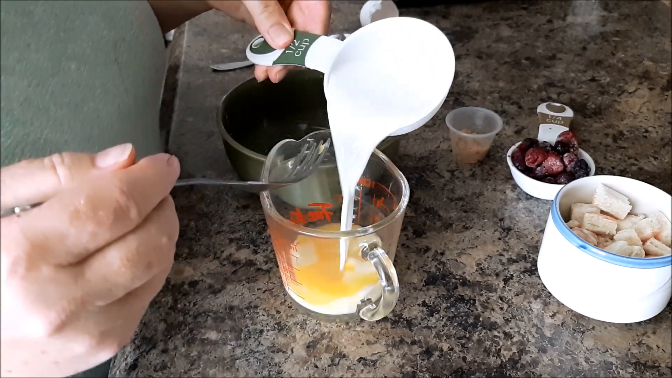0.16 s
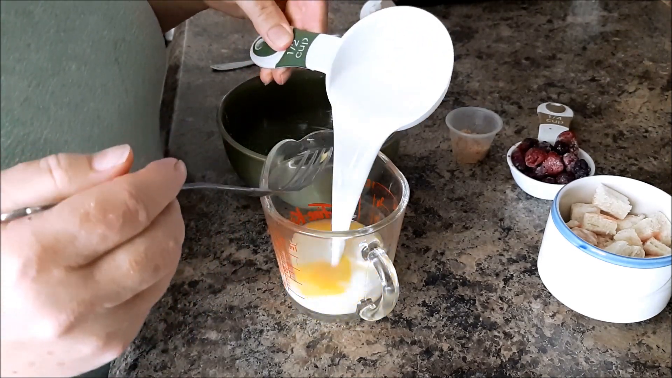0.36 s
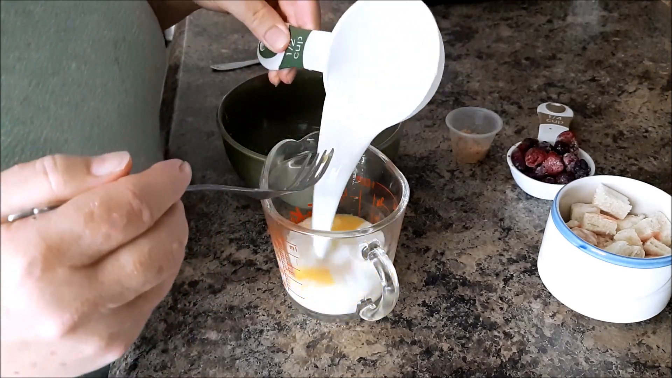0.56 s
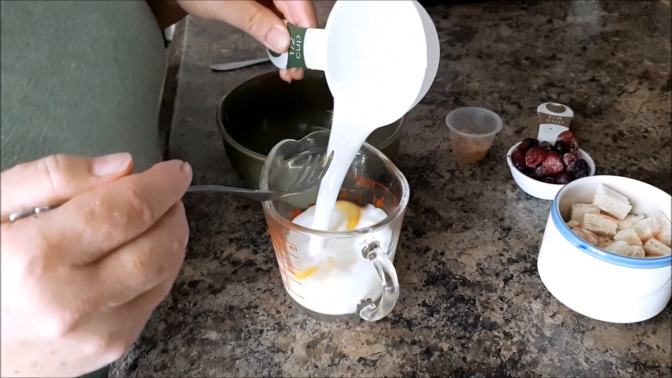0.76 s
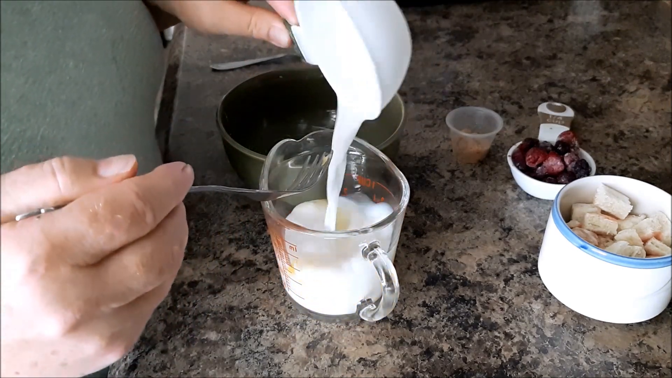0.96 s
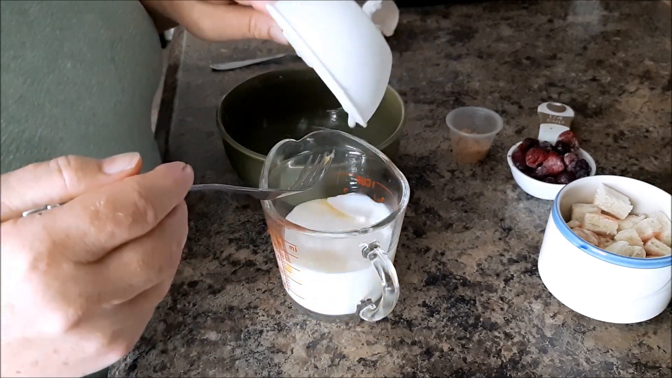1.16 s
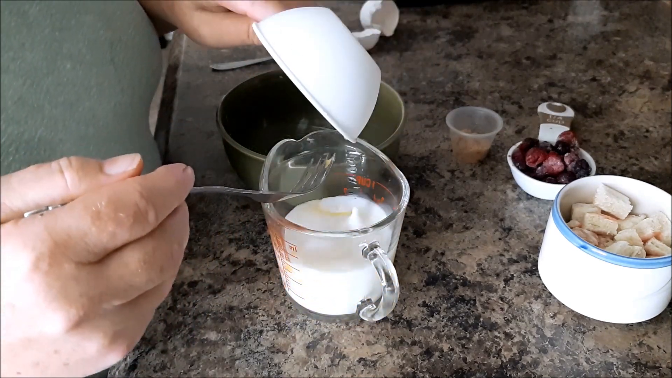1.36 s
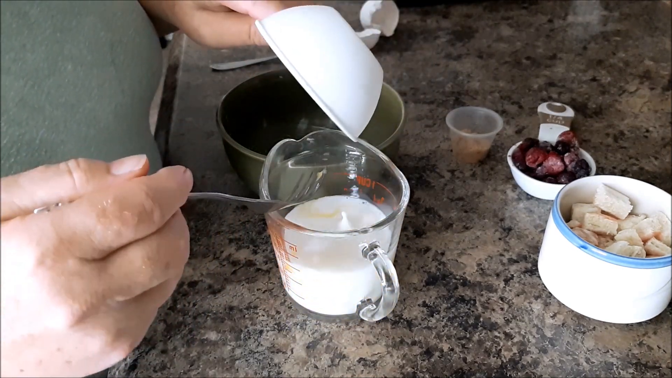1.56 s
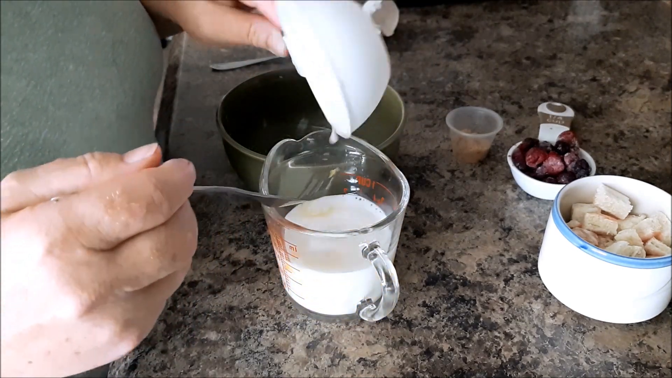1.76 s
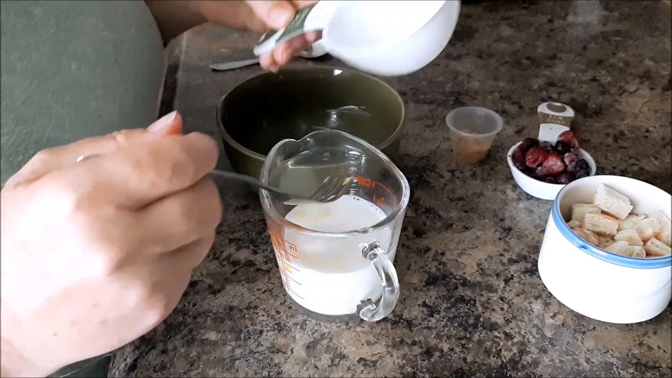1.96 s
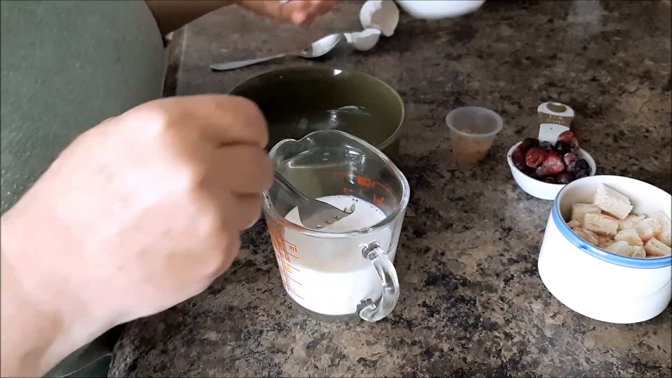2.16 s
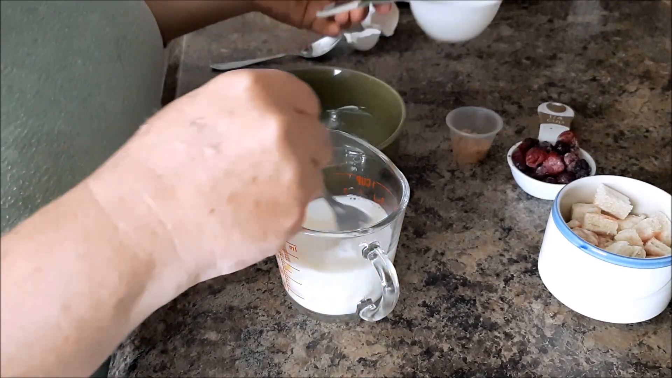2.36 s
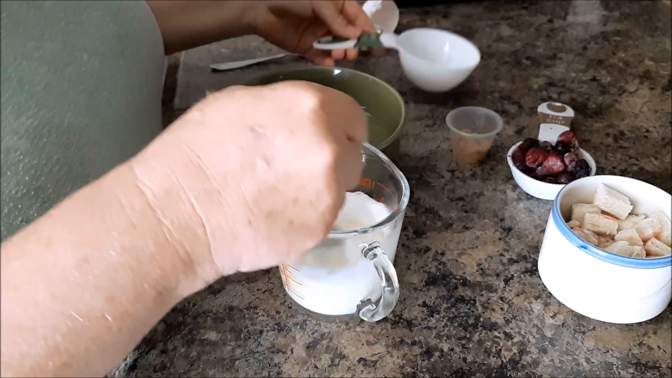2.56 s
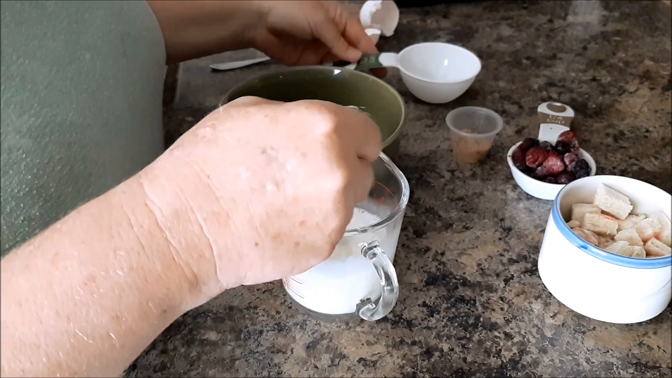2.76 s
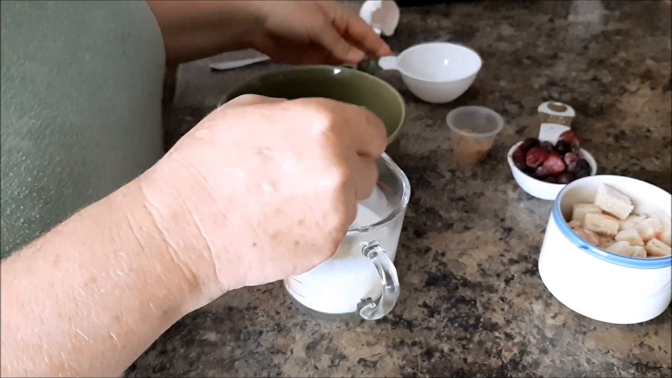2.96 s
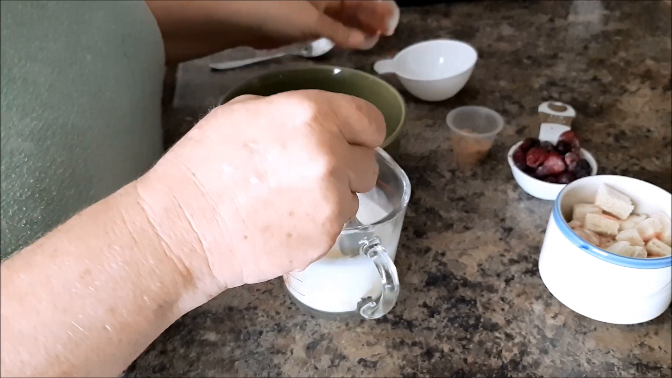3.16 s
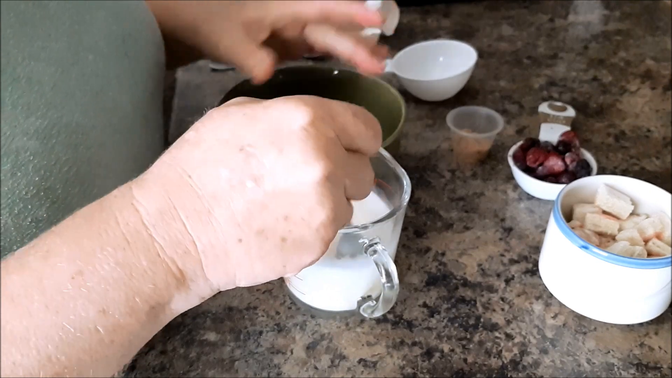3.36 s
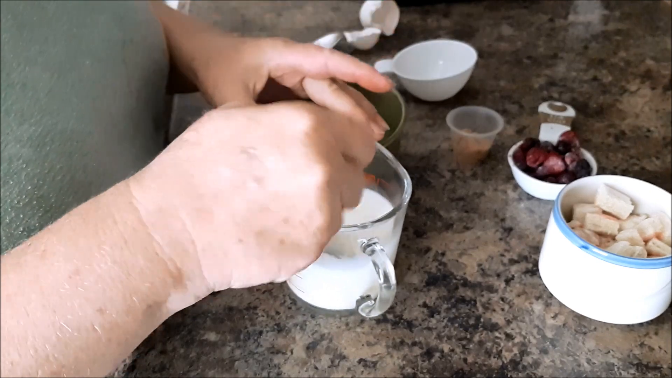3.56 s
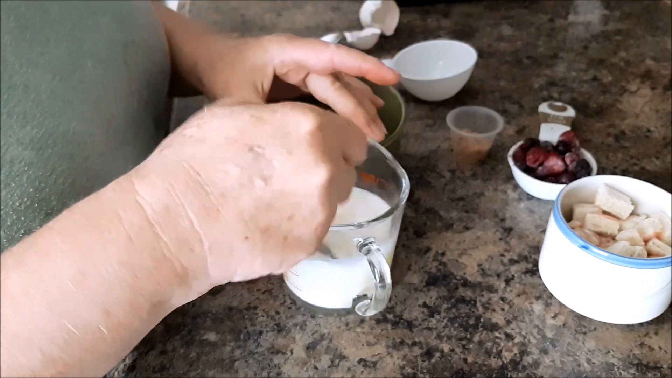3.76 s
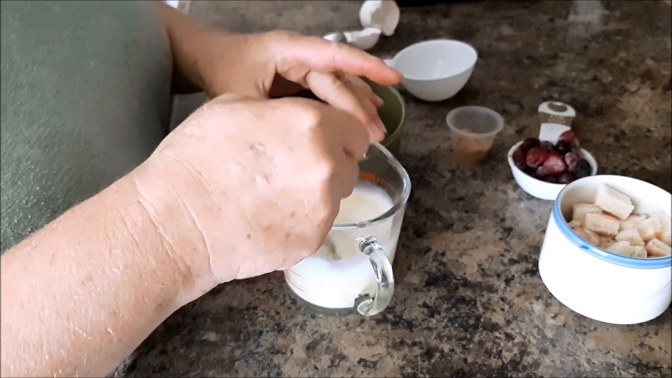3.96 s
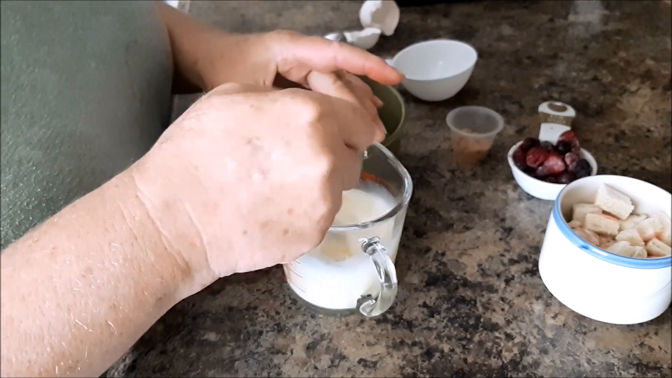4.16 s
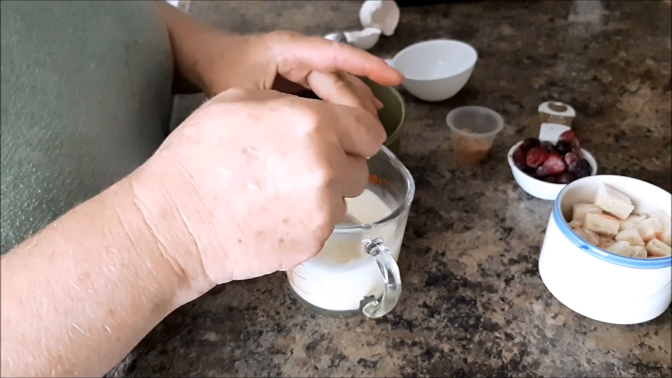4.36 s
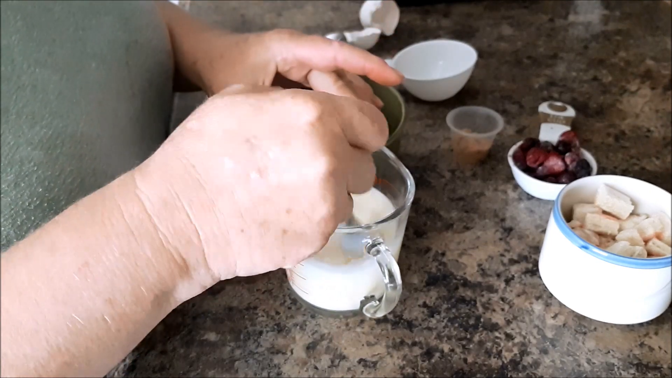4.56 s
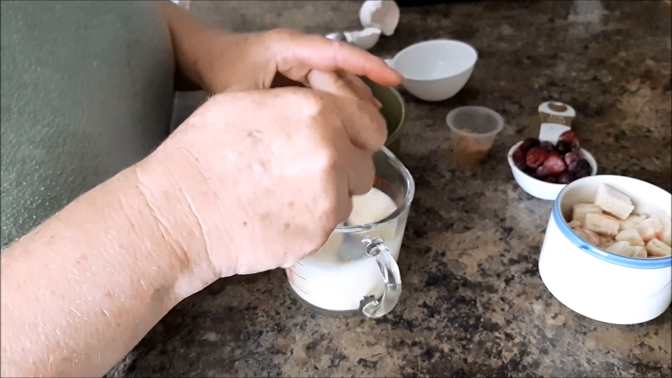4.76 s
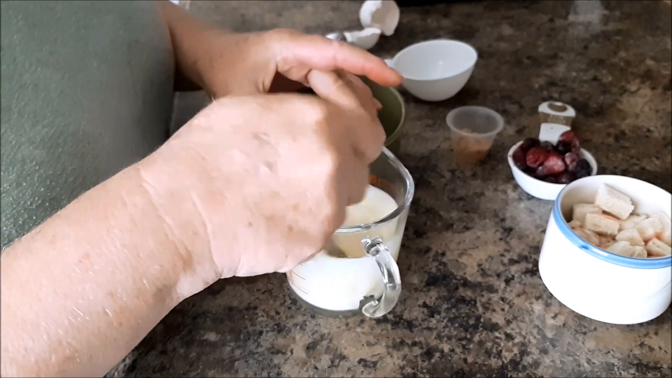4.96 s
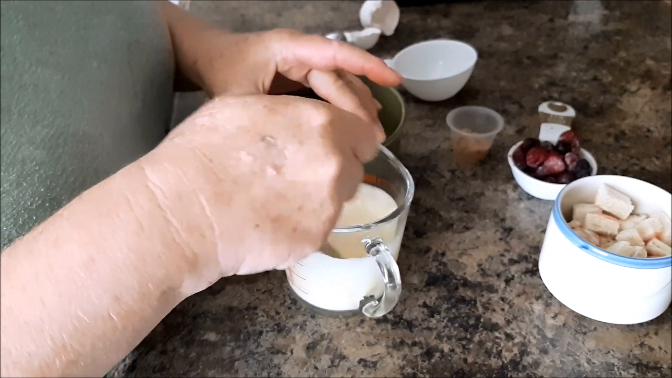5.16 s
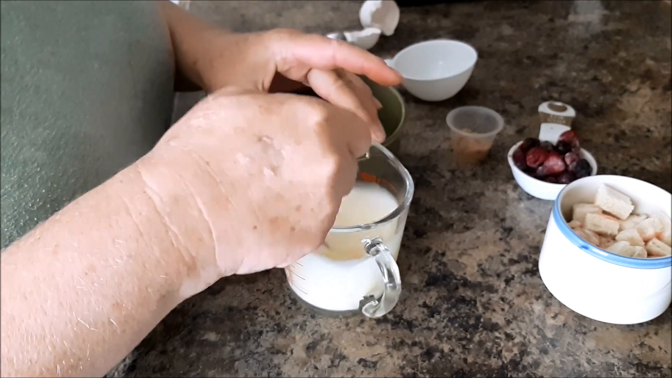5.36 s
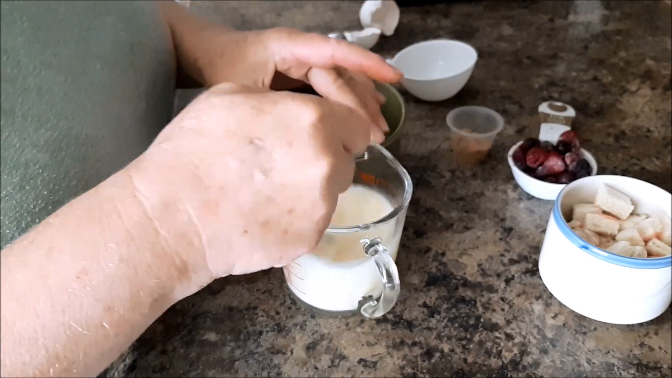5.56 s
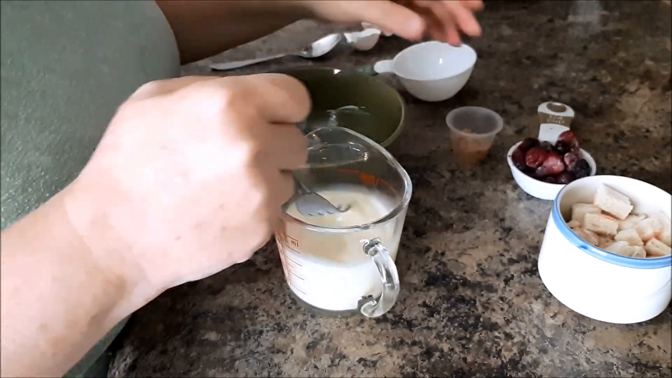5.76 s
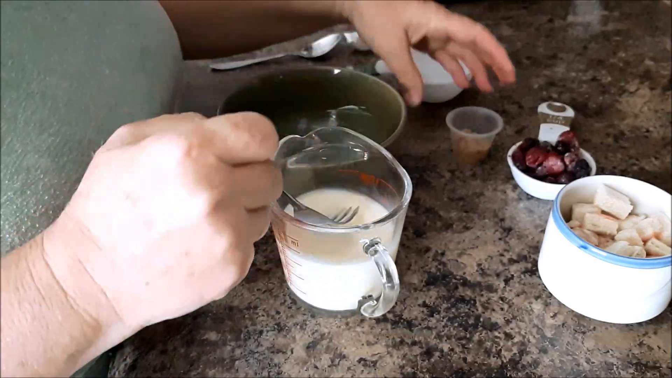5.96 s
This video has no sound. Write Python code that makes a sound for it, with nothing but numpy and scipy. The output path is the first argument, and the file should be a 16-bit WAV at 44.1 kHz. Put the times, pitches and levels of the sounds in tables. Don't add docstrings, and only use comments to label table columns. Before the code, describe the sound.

In a quiet kitchen with faint fan hiss and fridge hum, a light plastic scoop gives a few soft taps. Then a metal fork starts beating liquid in a glass cup, the scoop clacks and bounces on the stone counter, and fast, even glassy clicks continue with little wet gulps until they stop just before the end. Close phone microphone, slight room reverberation.

```python
import sys
import numpy as np
from scipy import signal
from scipy.fft import rfft, irfft, next_fast_len
from scipy.io import wavfile
from scipy.ndimage import uniform_filter1d

SR = 44100
rng = np.random.default_rng(int(sys.argv[2]) if len(sys.argv) > 2 else 0)


def voltage_ratio(level):
    return 10 ** (np.asarray(level, float) / 20)


def generate_wav(sig):
    pcm = np.round(np.clip(np.atleast_2d(sig).T, -1, 1) * 32767).astype(np.int16)
    wavfile.write(sys.argv[1], SR, pcm)


N = 264600
T = np.arange(SR // 3) / SR

# start [s], wall level [dB],
# tine under the liquid [dB], its pitch [Hz], shove on the cup [dB].
PUSHES = [(2.3368, -41.5, -42.5, 2600, -54.5), (2.464, -25, -35, 4390, -44), (2.611, -16.5, -28, 4400, -34),
          (2.6979, -24, -33, 4400, -48), (2.733, -50, -31.5, 4260, -67), (2.902, -28.5, -27, 4000, -45.5),
          (3.0893, -26, -25, 3770, -46), (3.265, -22, -23.5, 3850, -37.5),
          (3.4354, -31.5, -34, 3130, -45.5), (3.5968, -22.5, -34, 3440, -46),
          (3.7704, -23, -33.5, 3450, -43.5), (3.947, -23, -38, 4700, -44.5),
          (4.1157, -19.5, -16, 4015, -40.5), (4.2904, -22, -26.5, 4140, -34), (4.4615, -26, -24, 3106, -42),
          (4.6394, -19, -28.5, 3300, -38.5), (4.814, -24, -18.5, 4050, -34), (4.988, -21, -19.5, 4220, -39),
          (5.1683, -17.5, -23, 4210, -33), (5.346, -20, -15, 4030, -39.5),
          (5.5175, -15.5, -23.5, 4480, -44.5)]
RETURNS = [(2.501, -16.5, -22.5, 3080, -48), (2.809, -22, -33.5, 2980, -48),
           (3.0059, -24, -30.5, 4030, -47), (3.1783, -21, -18.5, 3573, -49),
           (3.353, -23, -23.5, 3500, -47.5), (3.5203, -20, -24, 3286, -46.5),
           (3.696, -17, -43, 4240, -43.5), (3.8659, -19.5, -35.5, 3240, -42.5),
           (3.912, -23.5, -22, 4550, -53), (4.0429, -18, -33.5, 2730, -45), (4.2172, -22, -28, 2745, -45),
           (4.397, -20, -27.5, 3385, -51), (4.5694, -20.5, -23, 2850, -41), (4.7434, -20.5, -30, 3230, -42),
           (4.9234, -20.5, -27, 2743, -41.5), (5.0996, -18.5, -23.5, 3150, -42.5),
           (5.2753, -15, -31.5, 2520, -43.5), (5.449, -22.5, -23, 2627, -42.5)]
# frequency [Hz], likeness [0 to 1].
ALIKE = [(60, .8), (130, 0.4), (290, 0.31), (640, 0.32), (1400, .02), (12000, .01)]


def unit(x):
    return x / np.sqrt(np.mean(x ** 2) + 1e-20)


def along(points, hz):
    f, v = np.transpose(points)
    return np.interp(np.log(hz + 1), np.log(f + 1), v)


def filtered(x, response):
    m = next_fast_len(x.shape[-1] + 8192)
    spectrum = rfft(x, m) * response(np.fft.rfftfreq(m, 1 / SR))
    return irfft(spectrum, m)[..., :x.shape[-1]]


def resonant(peaks):
    def response(f):
        total = 0
        for k, (centre, width, db) in enumerate(peaks):
            damping = 1j * f * width
            total = total + (-1) ** k * voltage_ratio(db) * damping / (centre ** 2 - f ** 2 + damping)
        return total
    return response


def stereo_angle(hz):
    return np.arccos(np.clip(along(ALIKE, hz), 0, 1)) / 2


def pair(response, count):
    def mid_side(hz):
        angle = stereo_angle(hz)
        return response(hz) * [np.cos(angle), np.sin(angle)]

    mid, side = filtered(rng.standard_normal((2, count)), mid_side)
    return unit(np.array([mid + side, mid - side]))


def ring(modes, scatter_db, rough=0, rise=.0001):
    hz, db, t60 = np.transpose(modes)[:, :, None]
    t = T[T < 1.5 * t60.max()]
    luck = rng.standard_normal((len(modes), 1))
    flutter = rough * np.cumsum(rng.standard_normal((len(modes), len(t))), axis=1)
    decay = voltage_ratio(db + scatter_db * luck - 60 * t / t60)
    x = np.sum(decay * np.sin(2 * np.pi * hz * t + flutter), axis=0)
    x = x * (1 - np.exp(-t / rise)) ** 2
    return np.pad(x / np.abs(x).max(), (0, len(T) - len(t)))


def puff(response, t60):
    noise = unit(filtered(rng.standard_normal(len(T)), response))
    return noise * voltage_ratio(-5.5 - 60 * T / t60)


def add(mix, s, x, pan_db, wet_db):
    # frequency [Hz], t60 [s].
    room = [(150, 0.41), (1000, 0.47), (4000, 0.36), (9000, 0.42), (15000, 0.26)]
    hz = np.fft.rfftfreq(256, 1 / SR)[:, None]
    t = np.arange(118) * 128 / SR
    angle = stereo_angle(hz) * np.clip(hz / 420, 0, 1)
    fade = voltage_ratio(-60 * t / along(room, hz))
    noise = rng.standard_normal((2, *fade.shape)) + 1j * rng.standard_normal((2, *fade.shape))
    mid, side = noise * [np.cos(angle), np.sin(angle)]
    tail = signal.istft(fade * [mid + side, mid - side], nperseg=256)[1][:, :len(T)]
    tail = tail * np.clip(T / 0.00047, 0, 1) * (1 + 3.5 * np.exp(-T / 0.0045))
    tail = tail / np.linalg.norm(tail) * 1.93
    wet = signal.fftconvolve(x[None], tail, axes=1)[:, :len(T)]
    sides = voltage_ratio([[pan_db / 2], [-pan_db / 2]])
    mix[:, round(s * SR):][:, :len(T)] += (x + voltage_ratio(wet_db) * wet) * sides


def tine_under_liquid(hz):
    modes = [(hz, 0, .022), (1.07 * hz, -5.5, .015), (0.82 * hz, -7, .015), (1.4 * hz, -5, .015)]
    return ring(modes, scatter_db=1.5, rough=0.12) * np.clip(T / 0.00085, 0, 1)


def rim(hz, t60):
    return ring([(hz, 0, t60), (0.93 * hz, -3.5, .02)], scatter_db=4, rough=0.011)


def glass_wall(near, where):
    # frequency [Hz], level [dB], t60 [s].
    glass = [(4400, -22, 0.0052), (5230, -3.5, 0.0095), (5130, 7, 0.061), (5052, 0.5, 0.017),
             (5792, 2.5, 0.015), (5990, -33, 0.057)]
    spot_hz = 5183 * np.exp(0.021 * where)
    spot = ring([(spot_hz, 0, .025), (1.04 * spot_hz, -5, .015)], scatter_db=0.5, rough=0.14)
    wall = voltage_ratio(-4.0) * ring(glass, scatter_db=7, rough=0.15) + voltage_ratio(-6.0) * spot
    handle_db = -12 + 2 * rng.standard_normal()
    handle = ring([(5936, 0, 0.042)], scatter_db=0, rough=.11)
    return wall + near * voltage_ratio(handle_db) * handle


def fork():
    # frequency [Hz], width [Hz], level [dB].
    tine_modes = [(9360, 1400, -1.5), (10320, 1440, 3), (14060, 1400, 8.5), (16400, 490, -9)]
    # frequency [Hz], level [dB per Hz].
    crack = [(410, -66), (700, -29), (1080, -8), (1940, -5), (2360, -23), (2630, 9), (3470, -5),
             (4060, 10.5), (4700, -19), (5220, -15), (7770, -4), (14100, -5), (15700, -7), (16500, -54.5)]
    # time [s], sparkle [dB].
    wrist = [(2.34, -30.5), (2.48, -30.5), (2.62, -36), (2.75, -34), (2.8, -27), (3.15, -26.5),
             (3.6, -24.5), (4.25, -23.5), (5.55, -26)]
    # start [s], peak [dB], pitch [Hz].
    rebounds = [
        (2.824, -46, 2780),
        (3.1086, -24, 2826),
        (4.151, -33, 3890),
        (4.2278, -28.5, 2570),
        (4.3034, -20, 3300),
        (4.365, -35, 2770),
        (4.7562, -24.5, 2670),
        (4.8338, -28, 4260),
        (5.191, -27.5, 3000),
        (5.36, -46, 4100),
    ]
    # start [s], peak [dB], pitch [Hz].
    rim_rings = [(2.466, -37.5, 1820), (2.5044, -19, 2060), (2.81, -36, 2120), (2.9035, -31, 2004),
                 (3.2651, -29, 1883), (3.5974, -34.5, 2104), (3.7712, -23.5, 1845), (3.8656, -33.5, 2123),
                 (3.9132, -23.5, 2053), (4.289, -35, 1920), (4.4622, -33.5, 1830), (4.5715, -27.5, 2110),
                 (4.642, -25.5, 1880), (4.8142, -25.5, 1940), (4.9886, -20, 2040), (5.167, -32, 1820),
                 (5.3462, -28, 1900), (5.5173, -28, 2100)]
    usual_db, usual_crack_db = -22, -30.5
    pan_db = -1.8
    mix = np.zeros((2, N + SR))
    blows = [(0, p) for p in PUSHES] + [(1, r) for r in RETURNS]
    for near, (s, db, under_db, under_hz, _) in blows:
        where, side = rng.standard_normal(2)
        wall = glass_wall(near, where)
        crack_db = usual_crack_db + .45 * (db - usual_db) + .35 * (under_db - usual_crack_db)
        sparkle_db = np.interp(s, *np.transpose(wrist)) + 0.44 * (db - usual_db)
        tines = []
        for hz, width, level_db in tine_modes:
            struck_hz = hz * np.exp(0.024 * rng.standard_normal())
            tines.append((struck_hz, width, level_db + 1.7 * rng.standard_normal()))
        body = voltage_ratio(db) * wall
        body = body + voltage_ratio(crack_db) * puff(lambda hz: voltage_ratio(along(crack, hz)), t60=0.022)
        body = body + voltage_ratio(sparkle_db + 3.5) * puff(resonant(tines), t60=0.022)
        lags = (rng.random(2) * .005 * SR).astype(int)
        chatter = body + sum(0.23 * np.pad(body, (k, 0))[:len(T)] for k in lags)
        x = voltage_ratio(1.0) * chatter * np.clip(T / 0.0022, 0, 1)
        x = x + voltage_ratio(under_db + 0.76) * tine_under_liquid(under_hz)
        x = x + near * voltage_ratio(db - 25.5) * rim(2047 * np.exp(.015 * where), t60=0.17)
        add(mix, s, x, pan_db + .9 * side, wet_db=-0.8)
    for s, db, hz in rebounds:
        add(mix, s, voltage_ratio(db - 0.8) * tine_under_liquid(hz), pan_db, wet_db=0.5)
    for s, db, hz in rim_rings:
        t60 = 0.03 + 0.088 * np.exp(-0.92 * (s - rim_rings[0][0]))
        add(mix, s, voltage_ratio(db - 2.5) * rim(hz, t60), pan_db, wet_db=-1)
    return mix[:, :N]


def liquid():
    # start [s], peak [dB],
    # pitch [Hz].
    gulps = [(2.902, -45, 1017), (3.112, -42, 1500), (3.264, -28.5, 1535), (3.439, -39.5, 1338),
             (3.772, -43, 1195), (3.898, -43, 1276), (3.948, -40, 1185), (4.046, -48, 1470),
             (4.124, -32, 1274), (4.136, -40, 855), (4.221, -44, 1093), (4.248, -45, 1216),
             (4.291, -24, 1340), (4.464, -28, 1364), (4.48, -29.5, 1114), (4.574, -41, 1370),
             (4.639, -33.5, 1160), (4.657, -29.5, 1120), (4.815, -30, 1407), (4.991, -23, 1536),
             (5.1, -45, 1285), (5.178, -23, 1110), (5.282, -31, 1510), (5.348, -26.5, 1330),
             (5.45, -37, 1206), (5.482, -50, 1040), (5.518, -43, 1104)]
    mix = np.zeros((2, N + SR))
    short = T[:SR // 10]
    for s, db, hz in gulps:
        t60 = .03 * voltage_ratio(-.4 * (db + 35))
        rising = np.sin(2 * np.pi * hz * (T + 1.5 * T ** 2))
        gulp = voltage_ratio(-60 * T / t60) * rising * (1 - np.exp(-T / 0.0028))
        age = np.clip(short - .03 * rng.random((40, 1)) ** 1.9, 0, None)
        pitch = 0.95 * hz * np.exp(1.21 * rng.random((40, 1)))
        spatter = np.sum(voltage_ratio(-60 * age * pitch / 14) * np.sin(2 * np.pi * pitch * age), axis=0)
        spatter = voltage_ratio(-19) * np.pad(spatter, (0, len(T) - len(short)))
        add(mix, s, voltage_ratio(db + 4.5) * (gulp + spatter), -.8, wet_db=-2.0)
    return mix[:, :N]


def counter():
    # frequency [Hz], level [dB], t60 [s].
    parts = [
        [(103.9, -1.5, 0.14), (80.4, -8, 0.157)],
        [(153, -28.5, 0.11), (179, -3.5, 0.22), (195.3, 3.5, 0.092)],
        [(325, 2.5, 0.18), (374.7, -11, 0.61), (488.4, 4.5, 0.0463)],
    ]
    # start [s], slab [dB], cabinet [dB], cup foot [dB].
    settle = [
        (5.6, -52, -50, -61.5),
        (5.661, -53, -57.5, -61.5),
    ]
    usual_shove_db = -40.5
    tips = []
    for rows, usual_slab_db in ((PUSHES, -36.5), (RETURNS, -46)):
        for s, *_, shove_db in rows:
            harder_db = shove_db - usual_shove_db
            tips.append((s, usual_slab_db + 0.32 * harder_db, shove_db, -45.5 + 1.18 * harder_db))
    shake = np.zeros(N + SR)
    for s, *levels_db in tips + list(settle):
        for db, modes in zip(levels_db, parts):
            part = voltage_ratio(db - 0.5) * ring(modes, scatter_db=5.5, rough=0.039, rise=0.011)
            shake[round(s * SR):][:len(T)] += part
    shake = filtered(shake[:N], lambda hz: 1 / (1 + (65 / (hz + 1)) ** 4))
    return shake * voltage_ratio([[-.7], [.7]])


def bowl():
    # start [s], peak [dB], thud [dB], tick [dB].
    drops = [
        (2.6224, -7, -16, -14.5),
        (2.6587, -15, -11.5, -15.5),
        (3.11, -33, -10, 2.5),
        (3.1263, -30, -5.5, -11),
        (3.143, -36.5, -7.5, -19),
    ]
    # frequency [Hz], width [Hz], level [dB].
    plastic = [(804, 320, -4.5), (1112, 260, 2.5), (1674, 430, 6), (1930, 144, 12.5), (2270, 336, 6),
               (2850, 123.5, -38), (4560, 440, -20.5)]
    # frequency [Hz], width [Hz], level [dB].
    thud = [(162, 35, 4.5), (321, 23, 0), (485, 220, -7.5), (631, 21, 2.5)]
    # start [s], peak [dB], pitch [Hz], t60 [s], tick [dB].
    taps = [(0.206, -59, 1040, 0.063, -4), (0.217, -50, 1045, 0.11, -11), (0.283, -35, 1078, 0.07, -9.5),
            (0.345, -51.5, 1077, 0.031, -15), (0.621, -59, 1080, 0.012, -6), (0.899, -68, 1210, 0.03, 12),
            (0.93, -65, 1330, 0.18, -5), (0.965, -58, 1393, 0.078, -8), (1.139, -50, 1110, 0.042, 9),
            (1.158, -42, 1582, 0.071, 11.5), (1.16, -47.5, 1046, 0.035, -12)]
    # frequency [Hz], level [dB per Hz].
    finger = [(800, -19), (1600, 1), (2200, -10.5), (3300, 4.5), (4200, 0.5), (5400, -8), (6200, -25),
              (16000, -18)]
    # start [s], peak [dB].
    flicks = [
        (0.218, -54),
        (0.9024, -59),
        (5.958, -52),
    ]
    mix = np.zeros((2, N + SR))
    blow = np.exp(-T / .00008)
    for s, db, thud_db, tick_db in drops:
        shell = filtered(blow, resonant(plastic))
        stone = filtered(blow, resonant(thud))
        rattle = voltage_ratio(-15) * puff(resonant(plastic), t60=.2) * np.clip(T / .008, 0, 1)
        tick = voltage_ratio(tick_db + 3.0) * puff(lambda hz: hz > 3000, t60=0.017)
        x = shell / np.abs(shell).max() + voltage_ratio(thud_db + 2.5) * stone / np.abs(stone).max()
        add(mix, s, voltage_ratio(db + 2.5) * (x + rattle + tick), -2.5, wet_db=-0.5)
    for s, db, hz, t60, tick_db in taps:
        tick = voltage_ratio(tick_db + 3.0) * puff(lambda f: voltage_ratio(along(finger, f)), t60=0.017)
        modes = [(hz, 0, t60), (0.81 * hz, -7.5, .03), (1.4 * hz, -12, .03), (1.9 * hz, -14, .03)]
        knock = ring(modes, scatter_db=4, rough=0.05, rise=0.0016)
        add(mix, s, voltage_ratio(db - .1) * knock, 1.5, wet_db=-13)
        add(mix, s, voltage_ratio(db - 3.5) * tick, -1.5, wet_db=0.5)
    for s, db in flicks:
        add(mix, s, voltage_ratio(db - 8.5) * puff(lambda hz: hz > 5200, t60=0.038), 1.5, wet_db=9)
    return mix[:, :N]


def fan():
    # frequency [Hz], level [dB per Hz].
    air = [(22, -19), (60, -17.5), (125, -18), (245, -17), (580, -27), (700, -34.5), (1440, -36.5),
           (2900, -30.5), (3600, -39), (4200, -34), (5400, -35), (5900, -46), (15200, -42.5),
           (16500, -33.5)]
    # frequency [Hz], left over right [dB].
    lean = [(60, 3), (110, -5.5), (200, 2.5), (380, 3), (700, -1.5), (1290, 2.5), (2380, 13), (4400, 21.5),
            (8120, -4.5), (15000, 3)]
    hiss = pair(lambda hz: voltage_ratio(along(air, hz)), count=N)
    hiss = filtered(hiss, lambda hz: voltage_ratio(along(lean, hz) * [[.5], [-.5]]))
    hiss = hiss / np.std(filtered(hiss.mean(axis=0), lambda hz: hz > 400))
    return voltage_ratio(-66) * hiss


def fridge():
    drift = uniform_filter1d(rng.standard_normal(N), size=4000)
    sway = uniform_filter1d(uniform_filter1d(rng.standard_normal(N), size=1200), size=1200)
    tone = np.sin(2 * np.pi * 154 * np.arange(N) / SR + .5 * unit(drift))
    return voltage_ratio(-56.5 + 2.2 * unit(sway)) * tone * voltage_ratio([[-.4], [.4]])


def scene():
    return fork() + liquid() + counter() + bowl() + fan() + fridge()


def band_limit(x):
    return signal.sosfilt(signal.butter(12, 17130, fs=SR, output="sos"), x)


def record(dry):
    def microphone(hz):
        low_cut = hz ** 2 / (hz ** 2 + 60 ** 2)
        high_cut = voltage_ratio(-45.0) + 1 / (1 + (hz / 15700) ** 60)
        return low_cut * high_cut

    heard = filtered(dry, microphone)
    return band_limit(heard)


dry = scene()
out = record(dry)
generate_wav(out)
```